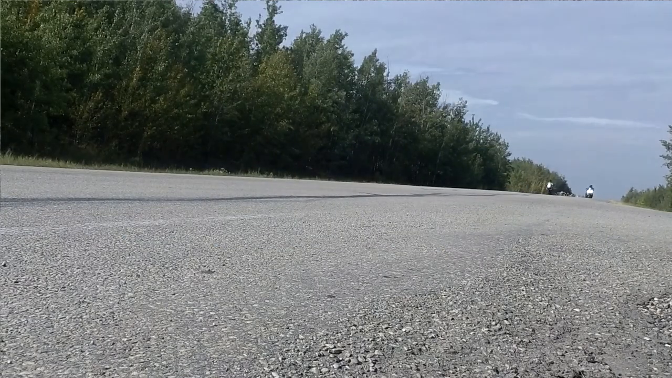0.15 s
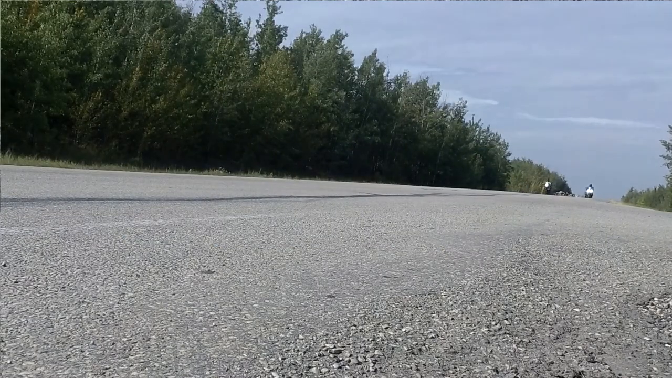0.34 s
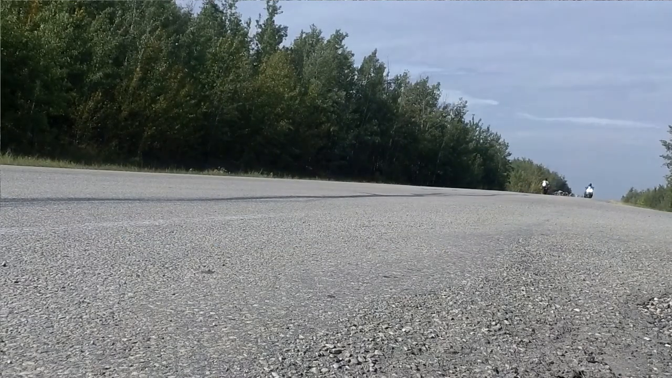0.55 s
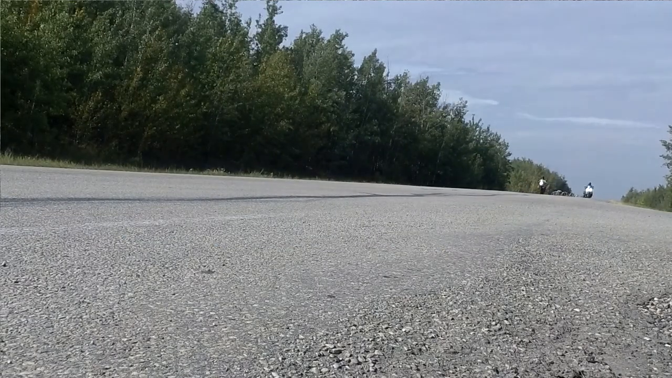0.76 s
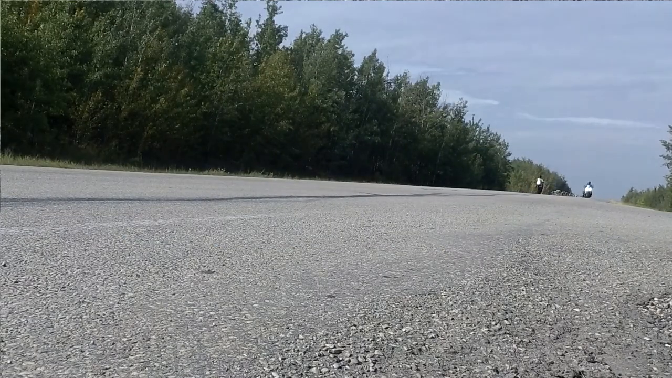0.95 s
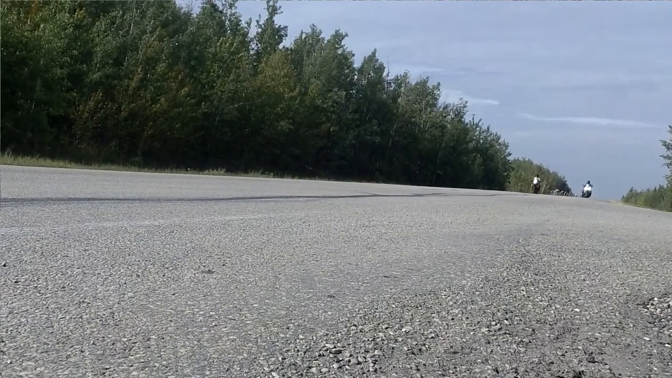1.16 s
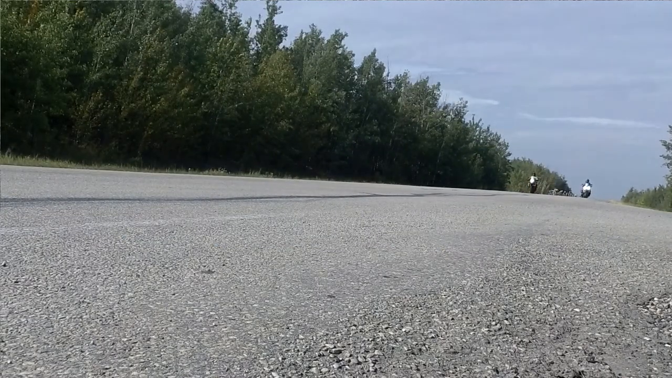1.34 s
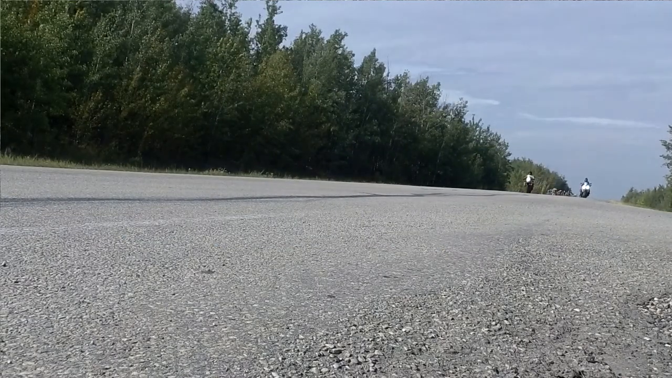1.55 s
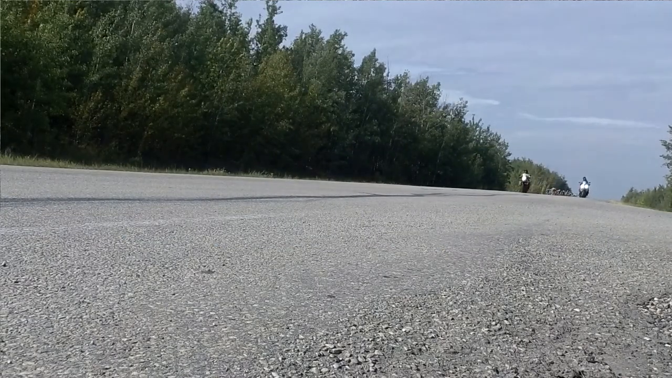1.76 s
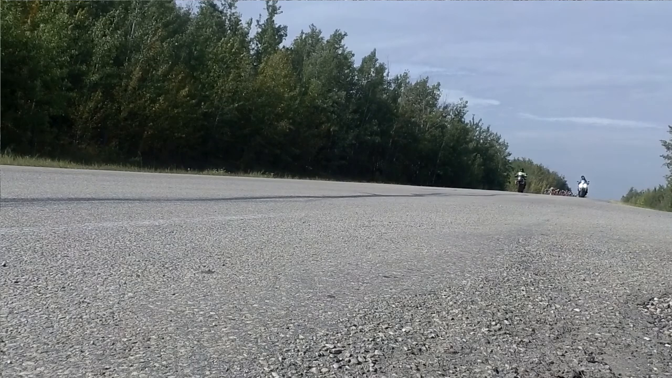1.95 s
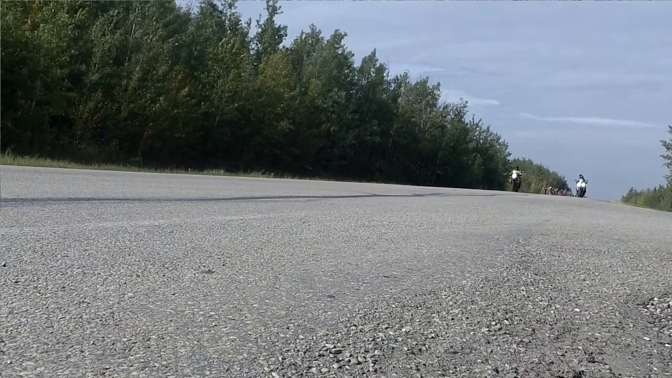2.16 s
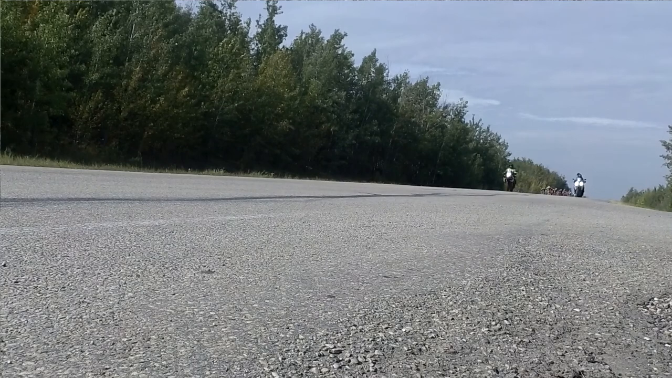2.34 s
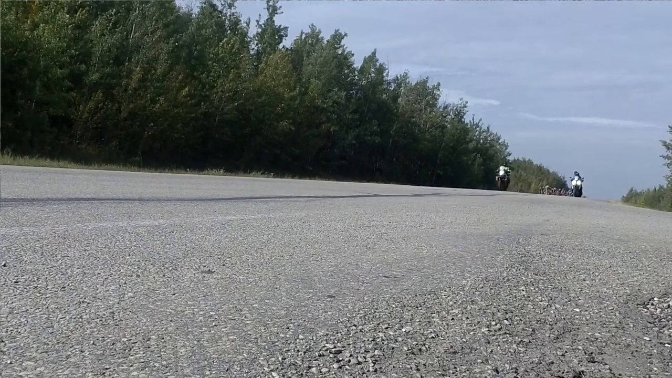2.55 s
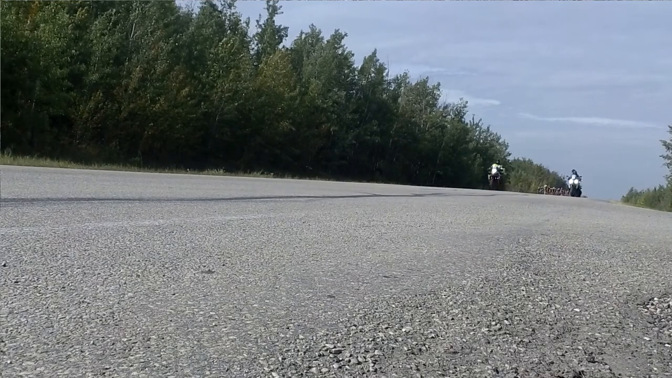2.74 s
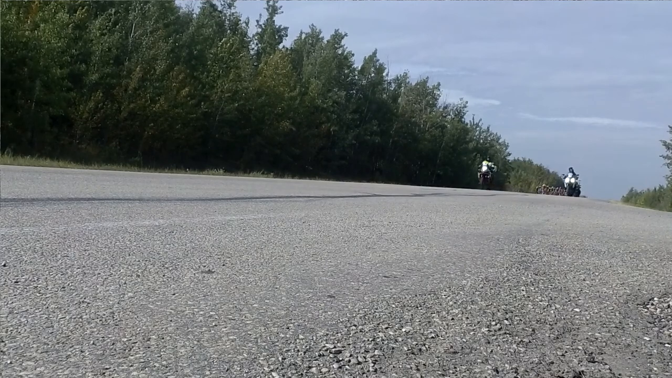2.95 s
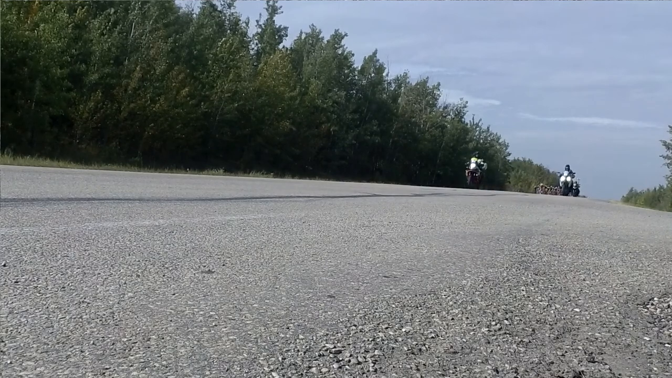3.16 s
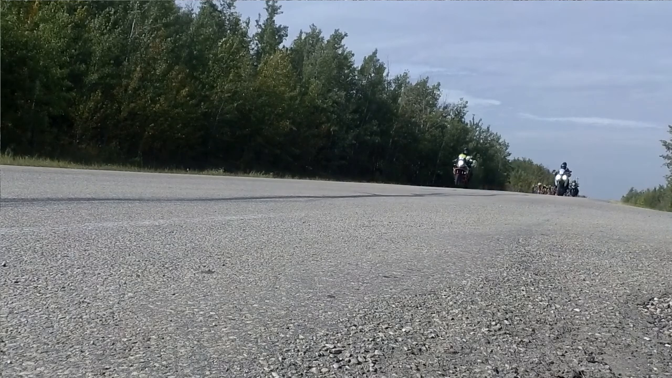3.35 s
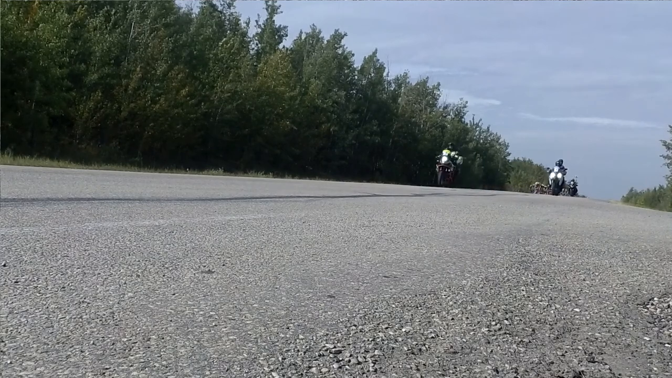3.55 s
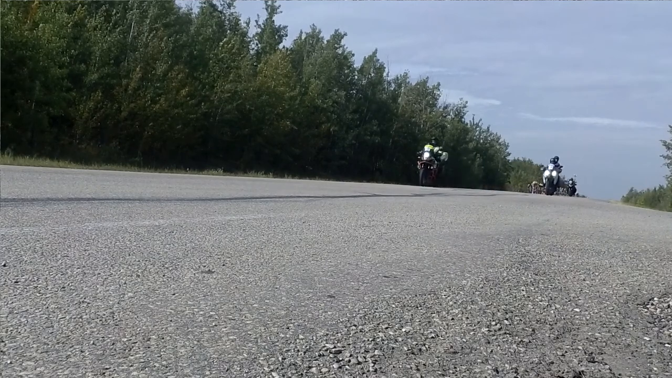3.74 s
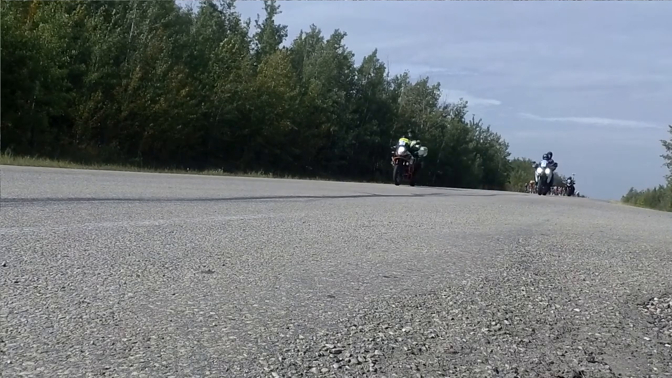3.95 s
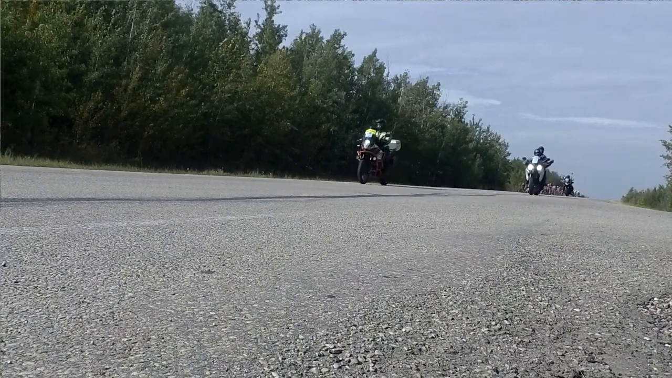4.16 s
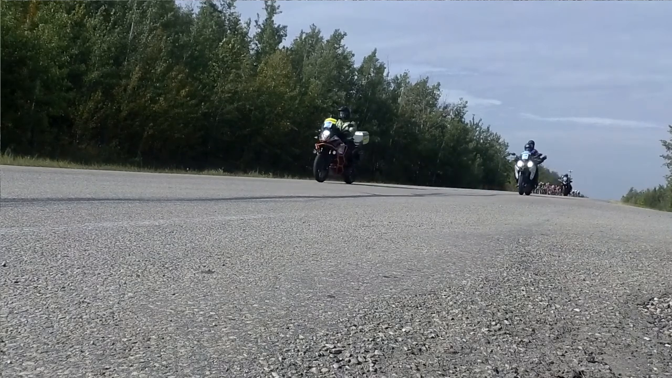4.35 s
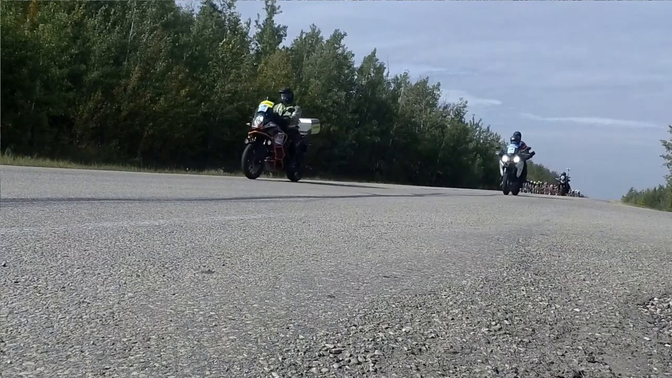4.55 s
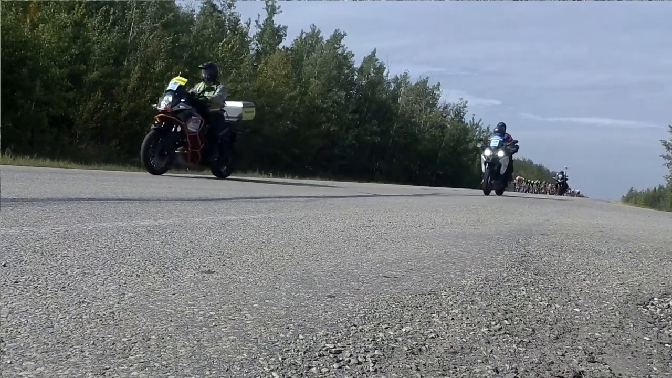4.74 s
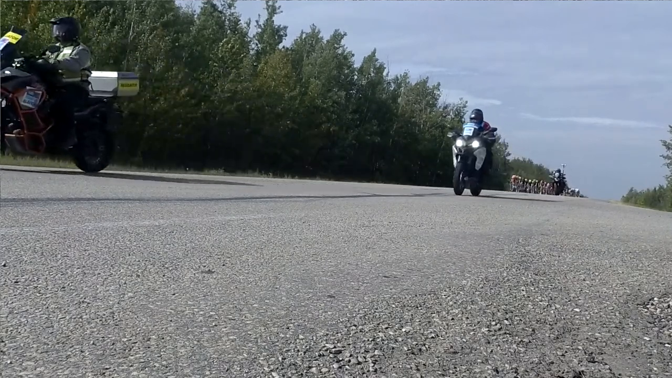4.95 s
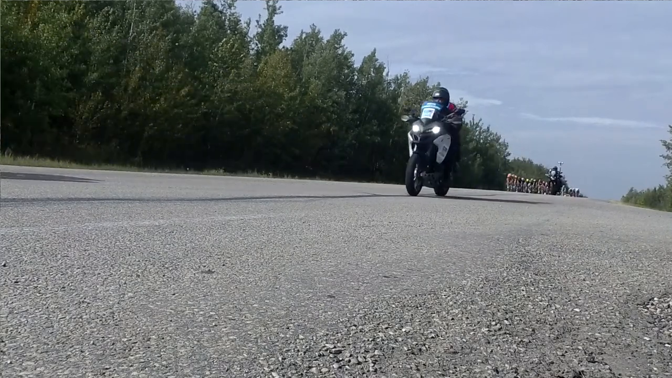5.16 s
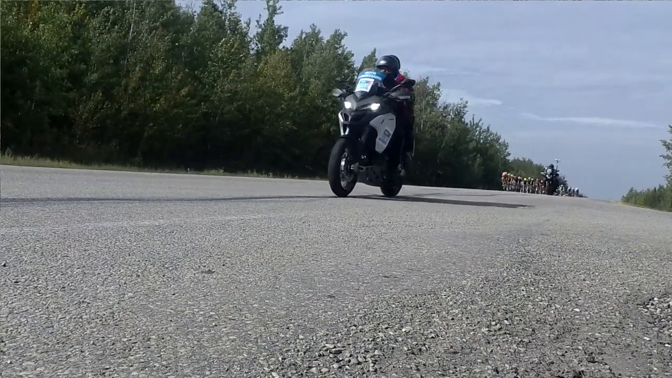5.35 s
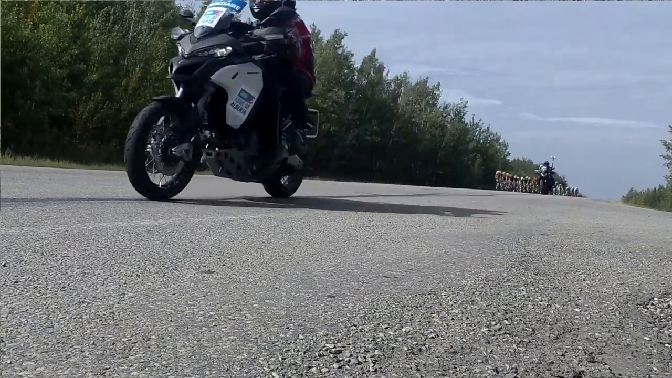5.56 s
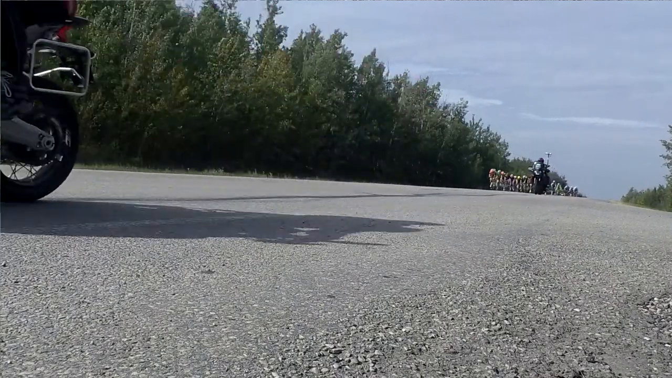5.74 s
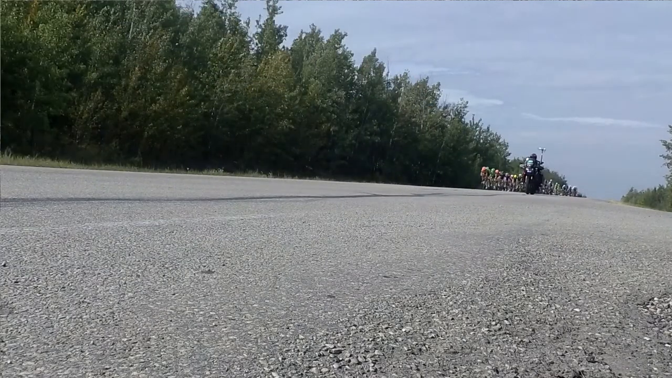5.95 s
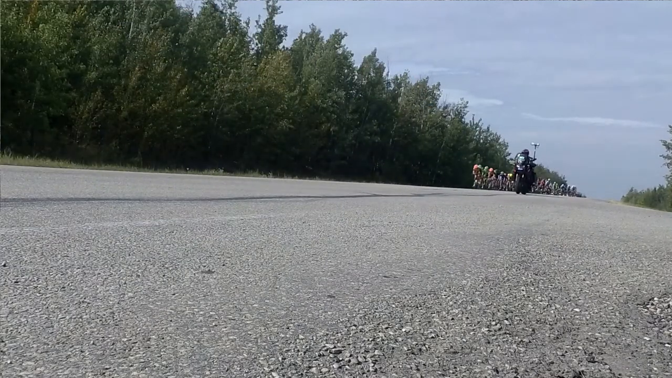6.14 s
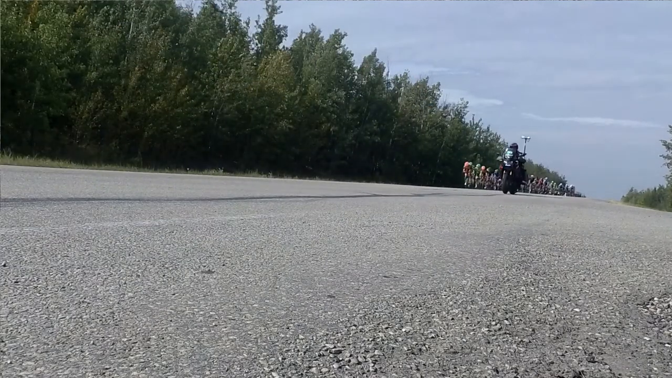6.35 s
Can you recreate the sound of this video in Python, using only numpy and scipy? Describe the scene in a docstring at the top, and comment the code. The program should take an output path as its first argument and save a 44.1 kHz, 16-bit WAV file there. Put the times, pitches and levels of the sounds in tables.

```python
"""Over the drone of far traffic, two motorcycles come up a highway, exhausts pulsing and tyres roaring.
One toots its horn twice and a line of trees answers faintly. Tyre hiss opens up as they clear a crest.
The muffled leader passes close at 5.2 s, then the louder, throbbing V-twin, which rolls off the
throttle, pops twice in its exhaust and flicks up grit. Last, the tyres of a third bike draw near."""
import sys
import numpy as np
from scipy import signal
from scipy.fft import rfft, irfft, next_fast_len
from scipy.io import wavfile
from scipy.ndimage import map_coordinates

SR = 44100
rng = np.random.default_rng(int(sys.argv[2]) if len(sys.argv) > 2 else 0)


def wav_record(signal):
    """Record a signal, one row per channel, as 16-bit PCM in the file named by sys.argv[1]."""
    frames = np.transpose(np.atleast_2d(signal))
    bounded = np.clip(frames, -1, 1)
    # unit amplitude maps onto the largest positive 16-bit level
    quanta = np.round(bounded * 32767).astype(np.int16)
    wavfile.write(sys.argv[1], SR, quanta)


N = 282240
TIME = np.arange(N) / SR


def amp(db):
    """Decibels to gain."""
    return 10 ** (np.asarray(db) / 20)


def unit(x):
    """Scale to rms 1."""
    return x / np.sqrt(np.mean(x ** 2) + 1e-20)


def edge(x):
    """A soft step from 0 to 1 around x = 0."""
    return .5 + .5 * np.tanh(x / 2)


def bell(x, centre, width):
    """A smooth bump of height 1."""
    return np.exp(-((x - centre) / width) ** 2)


def wobble(rate):
    """A smooth random curve, rate knots a second."""
    return map_coordinates(rng.standard_normal(int(N * rate / SR) + 4), [np.arange(N) * rate / SR])


def eq_gain(curve, hz):
    """Gain of an EQ curve of (Hz, dB) points, joined on a log axis."""
    points_hz, db = np.transpose(curve)
    return amp(np.interp(np.log(hz + 1), np.log(points_hz + 1), db))


def filtered(x, response):
    """x through a gain that depends on frequency."""
    size = next_fast_len(N + SR // 2)
    return irfft(rfft(x, size) * response(np.fft.rfftfreq(size, 1 / SR)), size)[:N]


def coloured(x, curve):
    """x through an EQ curve, at rms 1."""
    return unit(filtered(x, lambda hz: eq_gain(curve, hz)))


def patchy_noise(curve, patchy_db):
    """Coloured noise of rms 1, its gain mottled in time and frequency."""
    bins = signal.stft(rng.standard_normal(N), nperseg=1024)[2]
    blur = np.outer(np.hanning(9), np.hanning(15))
    patches = unit(signal.fftconvolve(rng.standard_normal(bins.shape), blur, "same"))
    return coloured(signal.istft(bins * amp(patchy_db * patches), nperseg=1024)[1][:N], curve)


def ringing(x, curve, size=8192):
    """x ringing in a minimum-phase body with this EQ curve, at rms 1."""
    cepstrum = irfft(np.log(eq_gain(curve, np.fft.rfftfreq(size, 1 / SR))))
    cepstrum[1:size // 2] *= 2
    cepstrum[size // 2:] = 0
    return unit(signal.fftconvolve(x, irfft(np.exp(rfft(cepstrum))))[:N])


def pulses(times, db, scatter_db):
    """Impulses whose level scatters around db."""
    size = amp(db + scatter_db * rng.standard_normal(len(times)))
    return np.bincount(np.clip(np.round(times * SR).astype(int), 0, N - 1), size, N)


# pass-bys: (time of drawing level [s], distance from the microphone [m])
LEADER_PASS, TWIN_PASS, FOLLOWER_PASS = (5.2, 4.5), (5.86, 3.0), (7.75, 4.0)
SPEED_M_PER_S, SOUND_M_PER_S = 11.0, 343
CREST_M, CREST_EDGE_M = 16.9, 2.3  # a crest in the road hides the treble beyond this distance
SHADOW_RAD, SHADOW_EDGE_RAD = 0.55, .13  # the camera's body shades a bike past this bearing


def place(bike):
    """A bike's distance (m) and bearing (radians: negative coming, 0 level, positive going)."""
    level_s, offset_m = bike
    past_m = SPEED_M_PER_S * (TIME - level_s)
    return np.hypot(past_m, offset_m), np.arctan2(past_m, offset_m)


def pass_by(bike, fall_db, shadow_db, crest_db=0, near_m=7.01):
    """Fader ride of a pass: distance, crest and shadow; inside near_m the swell flattens out."""
    metres, bearing = place(bike)
    doublings = np.log2(np.hypot(metres * np.sin(bearing), near_m) / near_m)
    shaded = edge((bearing - SHADOW_RAD) / SHADOW_EDGE_RAD)
    hidden = edge((metres - CREST_M) / CREST_EDGE_M)
    return amp(-fall_db * doublings - shadow_db * shaded - crest_db * hidden)


def lobe(bike, db, aim_rad, width_rad):
    """Gain of a beam that sweeps over the microphone as the bike goes by."""
    return amp(db * bell(place(bike)[1], aim_rad, width_rad))


def engine_cycles(bike, cycle_hz):
    """Running count of four-stroke cycles as heard, with the Doppler shift of the pass."""
    stretch = 1 + SPEED_M_PER_S / SOUND_M_PER_S * np.sin(place(bike)[1])
    return np.cumsum(cycle_hz / stretch) / SR


def strokes(cycles, scatter_db):
    """One impulse per engine cycle."""
    times = np.interp(np.arange(np.ceil(cycles[0]), cycles[-1]), cycles, TIME)
    return pulses(times, 0, scatter_db)


# drones of far engines: (starting pitch [Hz], rise [Hz/s], rms level [dB])
FAR_DRONES = [(44, 1.4, -47.5), (60.7, .3, -49), (94.4, .6, -45.5), (108.9, 3.5, -45)]
# low bed of traffic: (frequency [Hz], relative level [dB])
RUMBLE_EQ = [(15, -17.5), (35, 5.5), (60, -1.5), (110, 6.5), (200, -6), (350, -13), (700, -17.5),
             (2000, -55.5)]


def far_traffic():
    """Far engines waver and slowly rise over a low rumble."""
    drone = np.zeros(N)
    for hz, rise, db in FAR_DRONES:
        peak = np.sqrt(2) * amp(db + 0.66 * wobble(2.2))
        drone += peak * np.sin(2 * np.pi * (hz + rise * TIME / 2) * TIME + 1.1 * wobble(6))
    return drone + amp(-40.5) * patchy_noise(RUMBLE_EQ, patchy_db=2)


# boom of the leader's exhaust pipe: (frequency [Hz], relative level [dB])
LEADER_PIPE_EQ = [(20, -34), (30, -11.5), (59, 4.5), (88, 7.5), (118, -5.5), (150, -18), (240, -16),
                  (300, -2), (370, -11), (470, -10), (540, -12), (620, -30.5), (1500, -46), (3000, -64)]
LEADER_CYCLE_HZ = 28.685


def leader(cycles):
    """The leader thumps through a deep, muffled pipe; its chain sings and drops in pitch as it passes."""
    exhaust = ringing(strokes(cycles, scatter_db=0), LEADER_PIPE_EQ)
    link_phase = 2 * np.pi * 160 * cycles
    chain = unit(wobble(450) * np.cos(link_phase) + wobble(450) * np.sin(link_phase))
    return (amp(-28) * pass_by(LEADER_PASS, fall_db=7, shadow_db=-1) * exhaust
            + amp(-52) * pass_by(LEADER_PASS, fall_db=1.5, shadow_db=13.5, crest_db=25.5) * chain)


TWIN_CYCLE_HZ, TWIN_CLIMB_HZ_PER_S = 31.98, .397
ROLL_OFF_S, SETTLE_S, SAG_HZ, SAG_DB = 6.09, .5, 20, 6.5  # the throttle closes; revs and level sag


def overrun():
    """How far the V-twin has slackened since its throttle closed, 0-1."""
    return 1 - np.exp(-np.maximum(TIME - ROLL_OFF_S, 0) / SETTLE_S)


def twin_revs(mid_throb_s=5.8285):
    """Cycle count of the V-twin as it gathers revs, then sags; whole numbers fall mid-throb."""
    cycles = engine_cycles(TWIN_PASS, TWIN_CYCLE_HZ + TWIN_CLIMB_HZ_PER_S * TIME - SAG_HZ * overrun())
    return cycles - cycles[round(mid_throb_s * SR)]


# V-twin exhaust note; uneven firing cancels order four: (order [x cycle rate], relative level [dB])
TWIN_ORDERS = [(1, -14.5), (2, -10), (3, -6), (4, -15), (5, 1.73), (6, -1.3), (7, -7), (8, -18), (9, -13),
               (10, -13), (11, -17), (12, -22), (13, -17), (14, -21.5), (15, -20.5), (16, -33), (17, -20),
               (18, -21.5), (19, -28), (20, -21.5), (21, -36.5), (22, -43)]
# one-beat stumbles in the throb: (time [s], depth [0-1])
TWIN_MISFIRES = [(3.418, 0.5), (5.807, 0.9), (6.155, 0.95), (6.292, 0.7)]


def twin_exhaust(cycles):
    """The V-twin's two close firings merge into one throb a cycle, carried by orders five to seven."""
    note, rasp = np.zeros(N), np.zeros(N)
    orders, levels = np.transpose(TWIN_ORDERS)
    pipe = np.sign(orders - 4.5) * amp(levels)  # polarity flips above the cancelled order
    revs = 1 - SAG_HZ * overrun() / TWIN_CYCLE_HZ
    for order in orders:
        gain = revs * np.interp(order * revs, orders, pipe)  # resonances stay put as the revs sag
        phase = 2 * np.pi * order * cycles + 0.021 * order * wobble(35)  # no two firings are alike
        if order < 9:
            note += gain * np.cos(phase)
        else:
            rasp += gain * amp(-1) * np.cos(phase + rng.uniform(0, 2 * np.pi))  # scattered in the pipe
    gas_flow = 1 + .5 * np.cos(2 * np.pi * cycles + 1.63)  # most rasp as the throb starts
    softened = amp(-6.5 * edge(place(TWIN_PASS)[1] / 0.4))  # less rasp once the bike is past
    stumble = 1 - sum(depth * bell(TIME, at_s, 0.0087) for at_s, depth in TWIN_MISFIRES)
    effort = amp(-16 - SAG_DB * overrun() + 0.44 * wobble(35))
    mouth = lobe(TWIN_PASS, db=1.5, aim_rad=0.24, width_rad=0.53)  # the pipe's mouth swings into view
    swell = pass_by(TWIN_PASS, fall_db=9, shadow_db=2.2, near_m=9.84)
    return effort * mouth * swell * stumble * unit(note + gas_flow * softened * rasp)


def valve_clatter(cycles, t60_s=0.15):
    """Valve gear repeats one dense rattle every cycle, so it sounds as fine spectral lines."""
    t = TIME[:SR // 30]
    rattle = rng.standard_normal(len(t)) * amp(-60 * t / t60_s)
    return unit(signal.fftconvolve(strokes(cycles, scatter_db=2), rattle)[:N])


def asphalt_bounce(x, bike, engine_height_m=.8, mic_height_m=1.07, echo_gain=0.11):
    """x plus its echo off the road, at rms 1; the lag grows as the bike nears, so a comb sweeps down."""
    lag = SR * 2 * engine_height_m * mic_height_m / place(bike)[0] / SOUND_M_PER_S
    return unit(x + echo_gain * map_coordinates(x, [np.arange(N) - lag]))


# road noise from low roar to top sizzle, which air soaks up first: (frequency [Hz], relative level [dB])
ROAR_EQ = [(100, -21), (220, 6.5), (400, 1), (480, -1), (650, 0.5), (800, -1.5), (1000, -5), (1300, -8),
           (2000, -18.5), (5000, -38)]
RUSH_EQ = [(500, -8), (1100, -4), (1600, 0.5), (2300, -2.5), (3200, -6), (4600, -8.5), (7000, -18.5),
           (12000, -36)]
HISS_EQ = [(1500, -25), (3000, 1), (4600, 3), (7000, 1), (8000, 2.5), (9500, 0.5), (12000, -20),
           (15500, -21)]
SIZZLE_EQ = [(6000, -33), (9500, 8.5), (12000, -6.5), (15500, -6)]
# crankcase resonance that the growl rings in: (frequency [Hz], relative level [dB])
CRANKCASE_EQ = [(350, -39), (480, -5), (620, -10), (780, -9), (900, 0), (1010, 5), (1130, -4), (1300, -12),
                (2500, -41.5)]
# swells in the hiss: (time [s], half width [s], boost [dB])
HISS_SURGES = [(4.22, 0.14, 3), (4.67, 0.13, 2), (5.22, 0.077, 1.5), (5.74, .14, 2)]
# mix by layer: (leader fader [dB], V-twin fader [dB], loss per doubling of distance [dB],
# loss in the shadow [dB], loss behind the crest [dB])
ROAD_MIX = { "roar": (-35, -29.5, 7.5, 8.5, -0.4), "rush": (-38, -33, 9.5, 17.5, -0.66),
            "hiss": (-38, -37, 6.5, 22.5, 15), "sizzle": (-45, -39, 15, 26, 25),
            "growl": (-47.5, -40, 10.5, 16.5, -0.5), }
# rush and whine beam ahead, growl beams sideways: (boost [dB], bearing [rad], width [rad])
FRONT_BEAM, SIDE_BEAM = (2.5, -1.01, 0.27), (12, 0, 0.31)


def road_noise(bike, cycles, fader_column):
    """Tyres, air and engine clatter swell as a bike nears; the treble carries least far."""
    valves = valve_clatter(cycles)
    roar = amp(3) * patchy_noise(ROAR_EQ, patchy_db=0.5) + amp(-7.5) * coloured(valves, ROAR_EQ)
    rush = coloured(rng.standard_normal(N), RUSH_EQ) + amp(-7) * coloured(valves, RUSH_EQ)
    surges = amp(sum(db * bell(TIME, at_s, width_s) for at_s, width_s, db in HISS_SURGES))
    flutter = 1 + .18 * np.cos(2 * np.pi * cycles)
    layers = {
        "roar": asphalt_bounce(roar, bike),
        "rush": lobe(bike, *FRONT_BEAM) * asphalt_bounce(rush, bike),
        "hiss": surges * flutter * patchy_noise(HISS_EQ, patchy_db=0.5),
        "sizzle": coloured(rng.standard_normal(N), SIZZLE_EQ),
        "growl": lobe(bike, *SIDE_BEAM) * coloured(valves, CRANKCASE_EQ),
    }
    return sum(amp(row[fader_column]) * pass_by(bike, *row[2:]) * layers[name]
               for name, row in ROAD_MIX.items())


# horn cues: (start [s], end [s], fader [dB])
HORN_TOOTS = [(2.205, 2.321, -39.5), (2.408, 2.495, -42.8)]
# tone of the diaphragm and disc: (harmonic [x pitch], relative level [dB])
HORN_HARMONICS = [(1, 4), (3, -29), (8, -11.5), (9, -4)]


def horn(pitch_hz=378.4, droop_db_per_s=34, attack_s=0.0035, release_s=0.0037):
    """A buzzing diaphragm strikes a tone disc that rings near its ninth harmonic."""
    envelope = np.zeros(N)
    for start, end, db in HORN_TOOTS:
        gate = np.clip((TIME - start) / attack_s, 0, 1) * np.clip((end - TIME) / release_s, 0, 1)
        envelope += gate * amp(db - droop_db_per_s * np.maximum(TIME - start, 0))
    phase = 2 * np.pi * pitch_hz * TIME + 0.024 * wobble(50)
    return envelope * np.sqrt(2) * sum(amp(db) * np.sin(k * phase) for k, db in HORN_HARMONICS)


def tree_echo(x, return_db=-16.5, t60_s=1.1, build_s=0.02):
    """The tree line scatters back a thin, late tail."""
    t = TIME[:SR]
    tail = rng.standard_normal(SR) * amp(-60 * t / t60_s) * (1 - np.exp(-t / build_s))
    return amp(return_db) * signal.fftconvolve(x, tail / np.linalg.norm(tail))[:N]


def engine_tones(cycles, orders, level_rate, phase_rate):
    """Sines that track the revs, each wavering in level and phase."""
    return sum(amp(db + 2 * wobble(level_rate))
               * np.sin(2 * np.pi * order * cycles + .5 * wobble(phase_rate)) for order, db in orders)


# whine of gears and chain: (order [x cycle rate], relative level [dB])
GEAR_ORDERS = [(20, 3.5), (28.4, -9), (43, 3.5), (47, -0.5), (60, -7), (66, -7.5), (81, -6.5)]


def gear_whine(cycles):
    """The V-twin's gears and chain throw their whine ahead of the bike."""
    whine = engine_tones(cycles, GEAR_ORDERS, level_rate=6, phase_rate=12)
    swell = pass_by(TWIN_PASS, fall_db=9.5, shadow_db=15, crest_db=6)
    return amp(-42.5) * lobe(TWIN_PASS, *FRONT_BEAM) * swell * whine


# strongest tones in the crankcase: (order [x cycle rate], level before the beam [dB])
CRANKCASE_ORDERS = [(29, -48), (32, -50.5)]


def crankcase_ring(cycles):
    """Side on, the V-twin's crankcase rings clearly on two engine orders."""
    ring = engine_tones(cycles, CRANKCASE_ORDERS, level_rate=25, phase_rate=20)
    return lobe(TWIN_PASS, *SIDE_BEAM) * pass_by(TWIN_PASS, fall_db=15, shadow_db=20) * ring


# exhaust pop cues: (time [s], nominal peak level [dB])
POP_HITS = [(6.148, -8.3), (6.286, -6.2)]
# body of a pop: (frequency [Hz], relative level [dB], decay to -60 dB [s])
POP_BODY = [(97, 7, 0.044), (199, 7, 0.062), (300, -4, 0.022), (430, -8, 0.02)]


def exhaust_pops(attack_s=.001):
    """Fuel pops in the pipe, each time one quick, dull thud."""
    t = TIME[:SR // 4]
    thud = sum(amp(db - 60 * t / t60) * np.sin(2 * np.pi * hz * t) for hz, db, t60 in POP_BODY)
    thud *= 1 - np.exp(-t / attack_s)
    times, levels = np.transpose(POP_HITS)
    return signal.fftconvolve(pulses(times, levels, scatter_db=1), thud / abs(thud).max())[:N]


# grit cues: (time [s], level [dB])
GRIT_HITS = [(6.187, -48), (6.234, -33.5)]


def grit(half_width_s=0.0072):
    """Loose stone flicked off the asphalt scratches briefly behind the bikes."""
    bursts = sum(amp(db) * bell(TIME, at_s, half_width_s) for at_s, db in GRIT_HITS)
    scratch_eq = [(200, -2), (700, 15), (2500, -9), (8000, -12.5), (14000, -22)]
    return bursts * coloured(rng.standard_normal(N), scratch_eq)


# tyre band of the third bike: (frequency [Hz], relative level [dB])
FOLLOWER_EQ = [(700, -21.5), (1050, -12), (1300, 5), (1600, 3), (1900, -12.5), (3000, -31.5)]


def follower():
    """A third bike, still far off, is only a narrow rush of tyres."""
    swell = pass_by(FOLLOWER_PASS, fall_db=10, shadow_db=0, crest_db=7)
    return amp(-30.5) * swell * patchy_noise(FOLLOWER_EQ, patchy_db=1.5)


def scene():
    """Mono mix of the bikes, their road noise, the horn and the traffic behind."""
    leader_cycles, twin_cycles = engine_cycles(LEADER_PASS, LEADER_CYCLE_HZ), twin_revs()
    toots = horn()
    bikes = twin_exhaust(twin_cycles) + gear_whine(twin_cycles) + crankcase_ring(twin_cycles)
    bikes += exhaust_pops() + leader(leader_cycles)
    bikes += road_noise(LEADER_PASS, leader_cycles, fader_column=0)
    bikes += road_noise(TWIN_PASS, twin_cycles, fader_column=1)
    bikes += follower()
    return (bikes + toots + tree_echo(toots) + grit() + far_traffic())[None]


# colour of the microphone: (frequency [Hz], gain [dB])
MIC_EQ = [(3000, -0.5), (3300, -0.5), (3650, 4), (4050, -2.5), (4550, 4.5), (5200, -4.5), (6200, -12),
          (6600, -9), (6950, -1), (7900, -10), (9500, -14), (12000, -15.5), (15000, -19.5)]
TOP_HZ = 15400


def record(dry):
    """The camera's microphone port rings in the treble; nothing passes above the band limit."""
    return filtered(dry[0], lambda hz: eq_gain(MIC_EQ, hz) * (hz < TOP_HZ))[None]


dry = scene()
out = record(dry)
wav_record(out)
```